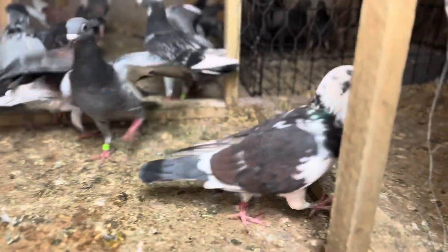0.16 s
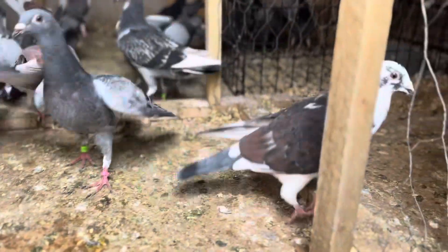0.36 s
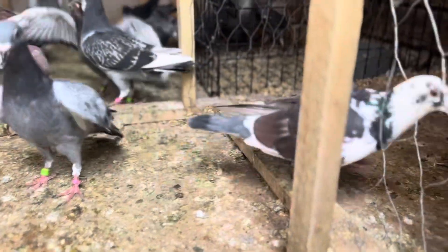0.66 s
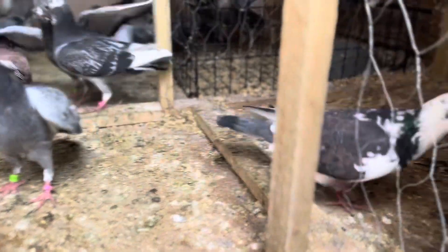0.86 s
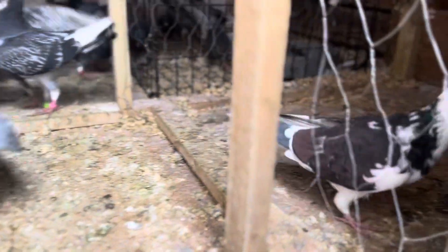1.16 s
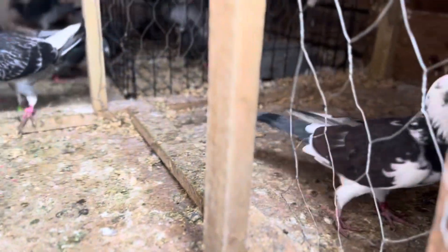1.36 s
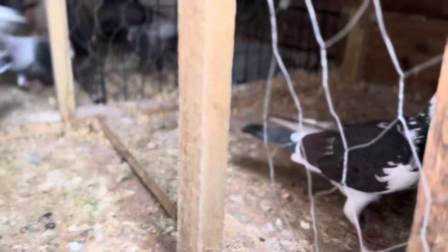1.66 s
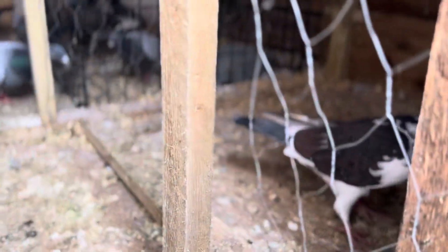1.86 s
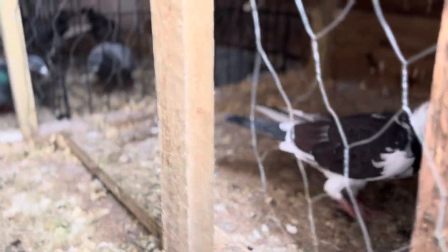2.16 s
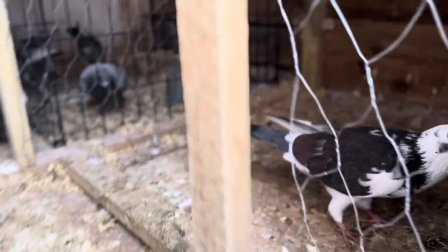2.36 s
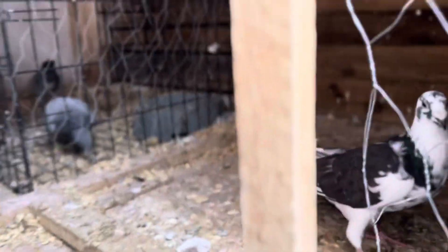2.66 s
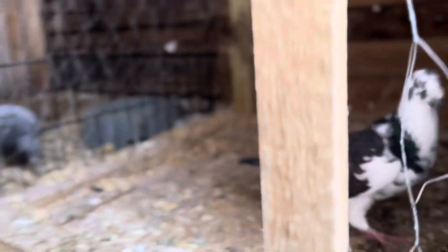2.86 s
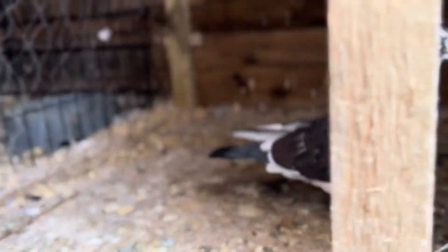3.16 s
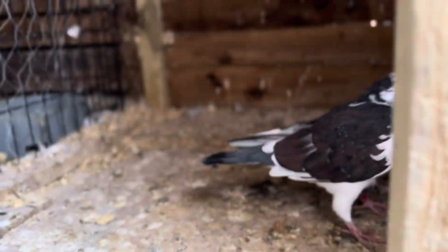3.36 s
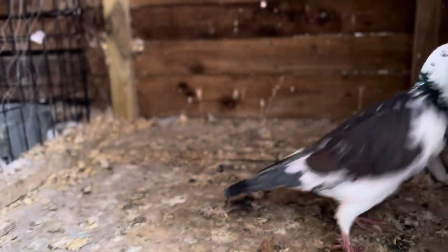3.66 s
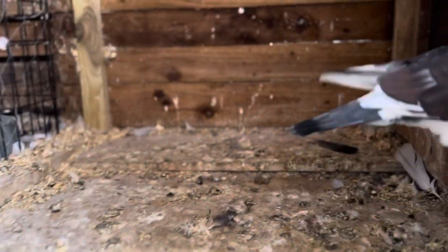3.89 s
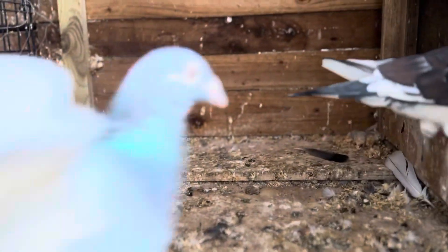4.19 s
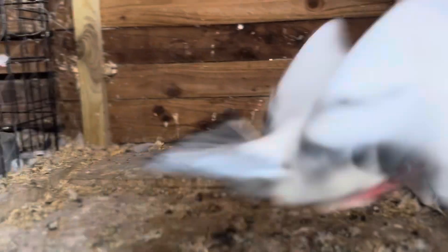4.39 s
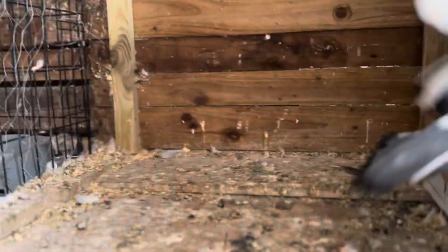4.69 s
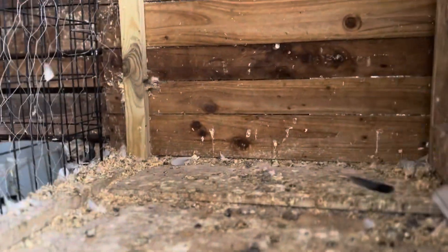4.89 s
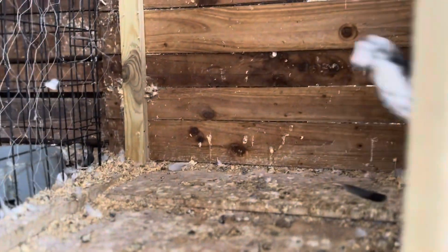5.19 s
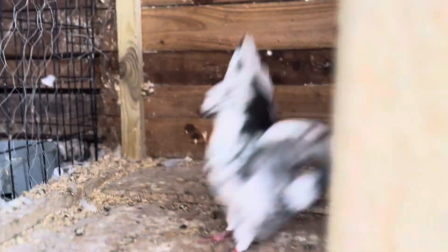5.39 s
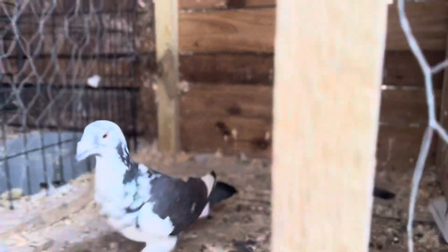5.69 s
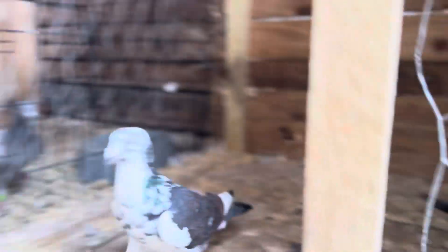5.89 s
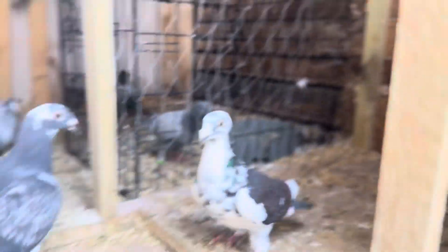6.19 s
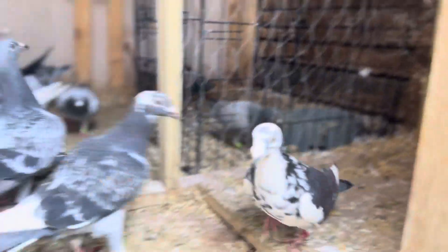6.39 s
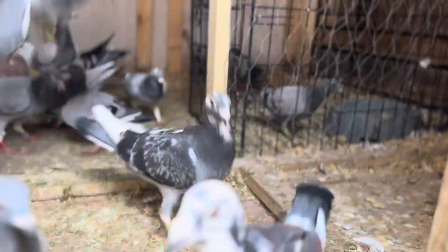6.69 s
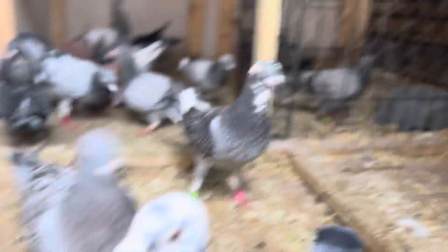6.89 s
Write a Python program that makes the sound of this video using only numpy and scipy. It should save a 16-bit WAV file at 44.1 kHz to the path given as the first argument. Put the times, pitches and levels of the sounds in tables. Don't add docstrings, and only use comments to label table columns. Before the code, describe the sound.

Inside a small plank pigeon loft, young birds give long, shrill, wavering squeals, some hoarse and doubled. A rapid run of crisp wing claps comes first, then a low buffeting gust hits the close microphones. Calls continue over litter scuffling, claw ticks, knocks and floor thumps, with another wing draught past the middle and a busy burst of flapping and a heavy thump near the end.

```python
import sys
import numpy as np
from scipy import signal
from scipy.fft import rfft, irfft, next_fast_len
from scipy.io import wavfile
from scipy.ndimage import uniform_filter1d

SR = 44100
rng = np.random.default_rng(int(sys.argv[2]) if len(sys.argv) > 2 else 0)


def master_out(mix):
    frames = np.transpose(np.atleast_2d(mix))
    ceiling = np.clip(frames, -1, 1)
    pcm = np.round(ceiling * 32767).astype(np.int16)
    wavfile.write(sys.argv[1], SR, pcm)


def level_to_linear(level):
    exponent = np.asarray(level, float) / 20
    return 10 ** exponent


N = 310905
T = np.arange(N) / SR
PORT_LAG = -14
OPPOSITE = np.array([[1], [-1]])


def colour(x, points):
    hz, db = np.transpose(points)
    log_f = np.log(np.maximum(np.arange(N // 2 + 1) * SR / N, 1))
    outside = np.maximum(np.log(hz[0]) - log_f, 0) + np.maximum(log_f - np.log(hz[-1]), 0)
    gain = level_to_linear(np.interp(log_f, np.log(hz), db) - 120 * outside)
    y = irfft(rfft(x) * gain, N)
    return y / np.sqrt(np.mean(y ** 2))


def walk(rate):
    hold = max(int(SR / rate), 1)
    levels = np.repeat(rng.standard_normal(N // hold + 1), hold)
    return 1.3 * uniform_filter1d(uniform_filter1d(levels, hold), hold)[:N]


def crackle(spiky_db):
    return rng.standard_normal(N) * level_to_linear(spiky_db * np.minimum(rng.exponential(size=N), 4))


def add(out, s, x):
    i = int(s * SR)
    out[..., i:i + x.shape[-1]] += x[..., :N - i]


def ports(x, pan_db, lag):
    return np.array([np.roll(x, lag) * level_to_linear(pan_db / 2), x * level_to_linear(-pan_db / 2)])


def ramp(times, levels):
    return np.interp(T, times, levels)


def voice(phrases, shakes, wobble, flutter_db, rough, overtone_db):
    hz, size = np.full(N, 3000.), np.zeros(N)
    for rows in phrases:
        s, pitch, db = np.transpose(rows)
        on = (T >= s[0]) & (T <= s[-1])
        hz[on] = np.interp(T[on], s, pitch)
        size[on] = level_to_linear(np.interp(T[on], s, db))
    shake_hz = 11
    for s, end, depth in shakes:
        fade = ramp([s - .04, s, end - .04, end], [0, 1, 1, 0])
        hz = hz * (1 + depth * np.cos(2 * np.pi * shake_hz * (T - s)) * fade)
    waver = wobble * (.7 * walk(30) + walk(80))
    phase = 2 * np.pi * np.cumsum(hz * (1 + waver)) / SR
    size = np.abs(uniform_filter1d(size, 400)) * level_to_linear(flutter_db * walk(60))
    air = walk(900) * np.cos(phase) + walk(900) * np.sin(phase)
    octave = level_to_linear(overtone_db) * (.9 + walk(700)) * np.sin(2 * phase)
    return size * (np.sqrt(2) * (np.sin(phase) + octave) + rough * air), size, phase


# time in seconds, pitch in Hz, level in dB.
FIRST_SQUEAL = [
    [(0, 4015, -39), (.04, 3780, -43), (.075, 3270, -48.5), (.1, 3130, -57), (.115, 3350, -44), (.14, 3580, -51.5), (.18, 3430, -45.5), (.23, 3450, -57), (.33, 3420, -54)],
    [(.355, 4326, -55), (.4, 4400, -45), (.43, 4600, -47), (.47, 4410, -55), (.51, 4160, -42), (.54, 4180, -48.5), (.58, 4234, -46), (.615, 4125, -41.5), (.65, 3490, -52)],
]
FAR_SQUEAL = [
    [(.44, 2600, -53), (.46, 2650, -52), (.49, 3050, -52), (.52, 3300, -52), (.56, 3120, -54), (.7, 3350, -59), (.78, 3350, -55), (.81, 3600, -56), (.98, 3420, -57)],
    [(.75, 3850, -52), (.78, 4100, -52), (.82, 4280, -55), (.88, 3950, -52), (.92, 4300, -49), (.97, 3800, -55), (1.02, 4300, -49), (1.04, 4150, -58)],
]
SHAKEN_SQUEAL = [
    [(1.12, 2750, -53), (1.17, 3050, -52), (1.205, 4100, -44), (1.24, 3870, -42), (1.31, 3850, -42), (1.35, 4080, -46), (1.6, 4100, -48), (1.69, 3950, -54), (1.82, 3880, -62)],
    [(1.3, 4100, -52), (1.35, 4500, -50), (1.6, 4600, -52), (1.74, 4550, -47), (1.775, 4700, -46), (1.8, 4400, -43), (1.825, 3800, -43), (1.845, 2600, -49), (1.855, 2500, -62)],
]
HOARSE_SQUEAL = [
    [(2.0, 2543, -56), (2.13, 2696, -58.5), (2.165, 3296, -51.5), (2.21, 3110, -56), (2.25, 3450, -51), (2.38, 3536, -49.5), (2.47, 3320, -55.5), (2.62, 3407, -49), (2.75, 3450, -52.5)],
    [(2.11, 3100, -64), (2.17, 3850, -54), (2.2, 3380, -57), (2.25, 3690, -48), (2.29, 4360, -49), (2.33, 4066, -36), (2.37, 4226, -48.5), (2.47, 4220, -53.5), (2.53, 4200, -49)],
]
HOARSE_SQUEAL_END = [
    [(2.77, 3650, -63), (2.83, 3250, -53), (2.87, 3200, -47), (2.9, 2720, -49.5), (2.93, 3130, -50.5), (2.95, 2800, -59), (2.97, 2990, -79)],
    [(2.54, 4100, -51), (2.63, 4200, -48.5), (2.67, 4006, -56), (2.74, 4140, -48.5), (2.8, 3875, -68)],
]
FOURTH_SQUEAL = [
    [(3.27, 2743, -50), (3.34, 3166, -56), (3.43, 3060, -57.5), (3.5, 3680, -50), (3.55, 3596, -41), (3.62, 3256, -47.5), (3.76, 3640, -51.5), (3.97, 3110, -47), (4.04, 2610, -61)],
    [(3.28, 3300, -57), (3.36, 3550, -59), (3.42, 3726, -75), (3.6, 4360, -67), (3.63, 4530, -51), (3.82, 4730, -48.5), (3.88, 4558, -51), (3.95, 3690, -56.5)],
]
FIFTH_SQUEAL = [
    [(4.78, 2690, -59), (4.84, 3206, -48.5), (4.89, 2890, -50), (4.98, 3510, -52.5), (5.06, 3410, -46.5), (5.26, 3580, -50), (5.44, 3680, -57), (5.62, 3403, -59), (5.8, 3113, -59.5)],
    [(4.7, 3560, -67), (4.81, 3800, -54), (4.9, 3700, -51.5), (5.15, 3867, -46.5), (5.3, 4340, -45.5), (5.4, 4255, -44), (5.5, 4194, -47), (5.59, 4950, -49), (5.66, 4650, -63)],
]
SIXTH_SQUEAL = [
    [(6.175, 2600, -55), (6.22, 3147, -53), (6.26, 3280, -54), (6.3, 3054, -57), (6.36, 3260, -66), (6.45, 3320, -54.5), (6.55, 3263, -62), (6.66, 3610, -49.5), (6.69, 3400, -63)],
    [(6.19, 3100, -61), (6.23, 3698, -54.5), (6.27, 4073, -49), (6.31, 3600, -56), (6.37, 3890, -47), (6.45, 4140, -51.5), (6.53, 4340, -47), (6.58, 4160, -50), (6.65, 3990, -46)],
]
LAST_SQUEAL = [
    [(6.71, 3515, -48), (6.77, 3604, -43), (6.82, 3450, -53), (6.87, 3455, -47), (6.9, 3520, -64), (6.94, 3360, -49.5), (6.98, 3270, -51), (6.99, 2900, -55.5), (7.015, 2960, -55)],
    [(6.71, 3850, -46), (6.78, 4034, -49), (6.86, 3880, -48), (6.9, 3860, -65), (6.945, 4060, -48), (6.97, 3770, -56), (7.0, 3670, -52), (7.03, 4050, -55), (7.05, 4200, -52)],
]
# time in seconds, pitch in Hz, level in dB.
LONE_PEEP = [
    (5.9, 2900, -72),
    (5.932, 3210, -59),
    (5.98, 3024, -70),
    (6.15, 3230, -74),
]
# time in seconds, pitch in Hz, level in dB.
MATE_PHRASES = [
    [(.085, 3900, -55), (.11, 4150, -57), (.135, 4050, -64)],
    [(.2, 3600, -60), (.24, 3800, -56), (.27, 3620, -60), (.3, 3620, -52.5), (.37, 3670, -56), (.41, 3950, -55.5), (.44, 4350, -56), (.46, 4760, -48.5), (.53, 4300, -55.5)],
    [(2.26, 3900, -54), (2.35, 3750, -49), (2.43, 3900, -55), (2.5, 3600, -50), (2.56, 3750, -50), (2.62, 3750, -51), (2.67, 3550, -60), (2.72, 3700, -54.5), (2.76, 3900, -64)],
    [(3.49, 3760, -53), (3.56, 3960, -48), (3.64, 3680, -58), (3.7, 3740, -51), (3.78, 3975, -51.5), (3.85, 3700, -61), (3.93, 3690, -57)],
    [(5.46, 3910, -55), (5.53, 4000, -50), (5.56, 4720, -46.5), (5.6, 4990, -52)],
    [(5.71, 2960, -66), (5.735, 2910, -58.5), (5.79, 2946, -61.5)],
    [(6.24, 3550, -54), (6.3, 3450, -54), (6.4, 3544, -61), (6.5, 3500, -56), (6.56, 4000, -49)],
]
# first crest in seconds, end in seconds, depth as a share of pitch.
LOWER_SHAKES = [
    (1.345, 1.702, 0.0496),
]
UPPER_SHAKES = [
    (1.332, 1.787, 0.0399),
    (5.212, 5.5, 0.0447),
]
# start in seconds, end in seconds, strain from 0 to 1.
STRAINED = [
    (2.22, 2.93, .9),
    (3.64, 3.82, .7),
    (5.5, 5.8, .6),
    (6.23, 6.7, 1),
]


def squeals():
    strain = sum(share * ramp([s - .05, s, end, end + .05], [0, 1, 1, 0]) for s, end, share in STRAINED)
    lower, upper = zip(FIRST_SQUEAL, FAR_SQUEAL, SHAKEN_SQUEAL, HOARSE_SQUEAL, HOARSE_SQUEAL_END,
                       FOURTH_SQUEAL, FIFTH_SQUEAL, SIXTH_SQUEAL, LAST_SQUEAL)
    wobble = .011 + .009 * strain
    low, low_size, low_phase = voice(lower + (LONE_PEEP,), LOWER_SHAKES, wobble, flutter_db=4.5 + 1.5 * strain,
                                     rough=.35 + .2 * strain, overtone_db=-19)
    high, high_size, high_phase = voice(upper, UPPER_SHAKES, wobble, flutter_db=4 + 2 * strain,
                                        rough=.3 + .2 * strain, overtone_db=-17)
    mate = voice(MATE_PHRASES, [], wobble=.018, flutter_db=5.5, rough=.5, overtone_db=-19)[0]
    both = np.sqrt(low_size * high_size)
    above = level_to_linear(-14 + 5 * strain + 3.5 * walk(25)) * np.sin(2 * high_phase - low_phase)
    below = level_to_linear(-20 + 4 * walk(12)) * np.sin(2 * low_phase - high_phase)
    drift = np.cumsum(900 * walk(22)) / SR
    between = strain * level_to_linear(4 * walk(30) - 4) * np.sin((low_phase + high_phase) / 2 + drift)
    sum_tone = level_to_linear(-14) * (2.1 + walk(900)) * np.sin(low_phase + high_phase)
    return low + high + mate + both * (sum_tone + above + below + between)


# frequency in Hz, density in dB per Hz.
FEATHER_SPECTRUM = [(1500, 5), (3000, -4), (4900, -1.5), (6600, 4.5), (8200, 4.5), (10000, -5), (13500, -2),
                    (16000, -5.5)]


def feather_noise(spiky_db):
    return colour(crackle(spiky_db), FEATHER_SPECTRUM)


# time in seconds, draught and tread near the microphones in dB, bustle in dB.
FLOCK_ACTIVITY = [(0.0, -37.5, -3), (.35, -33, 8), (.74, -34, 12.5), (1.572, -28, 16.5), (1.71, -28, 8),
                  (1.9, -35.5, -3.5), (2.49, -48, 0), (2.979, -40, -0.5), (3.4, -35, 6.5), (3.73, -40, 0),
                  (4.178, -34.5, 1), (4.42, -32.5, 10.5), (4.951, -38.5, -3), (5.422, -36.5, 5.5),
                  (5.93, -44, -10), (6.28, -39.5, -4), (6.671, -30.5, 15.5), (7.05, -37, 3.5)]
# frequency in Hz, density in dB per Hz.
RUMBLE_SPECTRUM = [(18, -52), (30, -1.5), (53, 1), (102, 1.5), (204, -7), (312, -12), (500, -20),
                   (650, -25.5), (1100, -120)]
# frequency in Hz, density in dB per Hz.
SCUFFLE_SPECTRUM = [(200, -14.5), (400, -2.5), (800, -0.5), (1600, -10.5), (2600, -11), (4500, -17)]


def flock():
    s, *columns = np.transpose(FLOCK_ACTIVITY)
    rumble_db, bustle_db = (ramp(s, column) for column in columns)
    stir = walk(4.88)
    mid, side = (colour(rng.standard_normal(N), RUMBLE_SPECTRUM) for _ in range(2))
    rumble = level_to_linear(rumble_db - 3 + 3.6 * walk(14)) * (mid + 0.37 * side * OPPOSITE)
    scuffle = np.array([colour(crackle(5.8), SCUFFLE_SPECTRUM) for _ in range(2)])
    rustle = np.array([feather_noise(4.1) for _ in range(2)])
    still = level_to_linear(-78.5) * np.roll(rustle, N // 3, axis=1) + level_to_linear(-63) * np.roll(scuffle, N // 3, axis=1)
    scuffle_gain = level_to_linear(-52 + bustle_db + 1.2 * stir + 4.5 * walk(30))
    rustle_gain = level_to_linear(-52.05 + 0.6 * bustle_db + 0.5 * stir + 2.54 * walk(30))
    return rumble + scuffle_gain * scuffle + still + rustle_gain * rustle


# time in seconds, feather clap in dB, cupped-wing slap in dB, hollow pitch in Hz.
WING_BEATS = [(.048, -22.5, -28, 764), (.477, -36.5, -24.5, 1740), (.577, -20, -19.5, 2340),
              (.675, -20.5, -25.5, 520), (.776, -12.5, -19.5, 790), (0.8754, -3.5, -19, 754),
              (0.983, -6, -15.5, 780), (1.094, -6, -13, 1360), (1.305, -21, -22, 2070),
              (1.61, -16, -22.5, 1750), (1.709, -22, -19.5, 700), (2.871, -27.5, -28, 782),
              (3.087, -30, -27, 564), (3.149, -28.5, -25.5, 795), (3.283, -26.5, -30.5, 710),
              (3.358, -16, -23.5, 1680), (3.475, -18, -22, 2163), (3.59, -16.5, -29.5, 587),
              (4.232, -25.5, -26, 780), (4.324, -12.5, -18, 890), (4.435, -21, -23.5, 700),
              (4.572, -18, -20.5, 544), (5.377, -29, -22, 680), (5.56, -35.5, -22.5, 730),
              (6.538, -18, -28.5, 1030), (6.595, -11, -13.5, 1020), (6.823, -16.5, -18, 984),
              (7.02, -20, -21, 500)]
# time in seconds, level in dB.
FLICKS = [(0.2534, -20.5), (1.2012, -14.5), (1.406, -18.5), (1.4594, -21), (1.5098, -22.5), (1.864, -30),
          (1.891, -32.5), (2.998, -25.5), (4.196, -32), (3.18, -25.5), (3.4166, -16), (3.7091, -24.5),
          (3.7693, -23), (4.637, -21.5), (4.703, -28), (5.882, -35), (5.911, -26.5), (5.9882, -33.5),
          (6.1365, -32.5), (6.739, -24.5),
          (1.536, -28.5), (2.3196, -33), (2.6549, -29.5), (4.0988, -34), (4.4094, -31), (4.5308, -29),
               (4.538, -30), (4.8294, -27.5), (4.845, -34), (5.0543, -27.5), (5.161, -34), (5.243, -32),
               (5.59, -39.5), (6.384, -32.5), (7.001, -27)]
FLUTTER_SPAN = (.4, 1.4)


def wings():
    feather = feather_noise(11.5)
    out, t = np.zeros(N), T[:SR // 5]
    brush = level_to_linear(-4) * np.minimum(t / 0.00097, 1) * np.exp(-(t / 0.016) ** 2)
    snap = level_to_linear(8) * np.exp(-((t - .0015) / 0.00077) ** 2)
    for s, db in [beat[:2] for beat in WING_BEATS] + FLICKS:
        decay_s = max(0.0042 * level_to_linear(0.64 * (db + 11)), .001)
        clap = np.minimum(t / 0.0019, 1) * np.exp(-t / decay_s) + snap
        shape = brush if FLUTTER_SPAN[0] < s < FLUTTER_SPAN[1] else clap
        i = min(int(s * SR), N - len(t))
        grain = feather[i:i + len(t)] / np.std(feather[i:i + SR // 100])
        add(out, s - .001, level_to_linear(db - 15) * grain * shape)
    return out


# time in seconds, level in dB, hollow pitch in Hz.
PLANK_KNOCKS = [(.176, -28, 1380), (.28, -27.5, 690), (.517, -25, 794), (1.338, -27, 810),
                (2.658, -26, 1000), (2.758, -29.5, 517), (3.401, -19, 810), (3.541, -24.5, 746.3),
                (4.195, -31, 980), (4.459, -24, 1200), (4.473, -29, 1270), (4.488, -28, 1050),
                (5.7, -32, 427), (5.913, -36, 800), (5.958, -36, 700), (5.995, -36.5, 810),
                (6.14, -37.5, 503), (6.3, -34.5, 606), (6.39, -34, 546), (6.49, -35, 960),
                (6.647, -23.5, 1360), (6.904, -38, 745)]
# time in seconds, level in dB, pitch in Hz.
WIRE_PLUCKS = [
    (3.151, -39, 4960),
    (3.1767, -28, 5080),
    (3.2048, -46, 4760),
]


def slaps():
    out, t = np.zeros(N), T[:SR // 8]
    rows = [(s, db, hz) for s, _, db, hz in WING_BEATS] + PLANK_KNOCKS
    wide_band = signal.butter(2, [300, 3200], "band", fs=SR, output="sos")
    for (s, db, hz), blows in zip(rows, rng.standard_normal((len(rows), len(t)))):
        blows = blows * np.minimum(t / 0.0035, 1) * np.exp(-t / 0.0038)
        ring = signal.lfilter(*signal.iirpeak(hz, 2.4, SR), blows)
        burst = ring + .35 * signal.sosfilt(wide_band, blows)
        add(out, s - .001, level_to_linear(db + 1) * burst / np.abs(burst).max())
    for s, db, hz in WIRE_PLUCKS:
        add(out, s, level_to_linear(db) * np.sin(2 * np.pi * hz * t * (1 - 1.5 * t)) * np.exp(-t / .003))
    return out


# time in seconds, level in dB, pitch in Hz.
FOOTFALLS = [(.295, -35, 112), (0.641, -37, 94.8), (0.799, -25, 116), (0.967, -26, 106), (1.987, -27, 91),
             (2.084, -27.5, 84), (2.885, -31, 112.5), (3.106, -32, 81), (3.299, -26, 113.6),
             (3.44, -30, 113), (3.492, -23.5, 135.4), (3.557, -26, 107), (4.503, -29.5, 96.5),
             (4.593, -22.5, 107.6), (4.861, -25.5, 111.4), (5.082, -31.5, 97.8), (5.406, -24.5, 110.4),
             (5.578, -31, 115), (5.961, -33, 112.4), (6.669, -24, 92.6), (6.805, -14.5, 123.6),
             (6.924, -24, 126.7)]
# time in seconds, level in dB, pitch in Hz.
EDDY_POPS = [(1.496, -20, 390), (1.717, -22, 496), (1.73, -13, 288), (1.739, -13, 254), (1.75, -19, 427),
             (1.789, -15, 330), (1.797, -17.5, 515), (1.804, -10.5, 442), (1.8212, -5, 392),
             (1.823, -10, 615), (1.836, -14.5, 380), (1.8476, -28, 483), (1.851, -21.5, 810),
             (1.868, -29.5, 442), (3.406, -30.5, 358), (3.468, -27.5, 257), (4.343, -20, 308),
             (4.381, -17.5, 230), (4.387, -15.5, 280), (4.427, -15.5, 302), (4.4351, -12.5, 327.6),
             (5.392, -26, 351.2), (6.66, -24, 273), (7.028, -24, 298)]
# time in seconds, level in dB, pitch in Hz, length in seconds.
WING_PUFFS = [
    (1.349, -31, 77.5, 0.053),
    (1.437, -24, 74, 0.016),
    (1.471, -14.5, 58.6, 0.013),
    (1.566, -15.5, 66.3, 0.02),
    (1.697, -14.5, 98, 0.03),
    (1.752, -3, 88, .0065),
    (1.794, -9, 93, 0.059),
    (1.87, -12, 91.6, 0.029),
    (4.393, -7.5, 62, 0.035),
    (6.561, -21.5, 60.7, .021),
]


def thumps():
    out, t = np.zeros((2, N)), T[:SR // 5] - .05
    eddies = colour(crackle(0.28), [(120, 22.5), (400, 3), (900, -13.5), (1400, -19.5)])
    pops = [(s, db, hz, 1.84 / hz) for s, db, hz in EDDY_POPS]
    steps = [(s, db, hz, 3.22 / hz) for s, db, hz in FOOTFALLS]
    rows = WING_PUFFS + pops + steps
    for (s, db, hz, length), (turn, slide, skew) in zip(rows, rng.random((len(rows), 3))):
        u = t / max(length, .003)
        bell = np.exp(-2.4 * u ** 2 / (1 + 0.74 * np.maximum(u, 0)))
        cycles = hz * t * (1 + 1.04 * (slide - .5) * np.tanh(u))
        spread = .3 * min(hz / 110, 1) * (skew - .3) * OPPOSITE
        swing = np.sin(2 * np.pi * (cycles + turn + spread))
        i = min(int(s * SR), N - len(t))
        add(out, max(s - .05, 0), level_to_linear(db) * bell * (swing + level_to_linear(-12) * eddies[i:i + len(t)]))
    return out


# frequency in Hz, 60 dB decay time in seconds.
LOFT_DECAY = [(100, 0.54), (500, 0.22), (1500, 0.11), (4000, 0.19), (10000, 0.089)]


def loft(x):
    t, tail = T[:SR // 2], 0
    decay_hz, decay_s = np.transpose(LOFT_DECAY)
    for hz in 63 * 2. ** np.arange(8):
        top_hz = min(hz * np.sqrt(2) * (1 + (hz > 8000)), .45 * SR)
        octave = signal.butter(2, [hz / np.sqrt(2), top_hz], "band", fs=SR, output="sos")
        t60 = np.interp(np.log(hz), np.log(decay_hz), decay_s)
        noise = signal.sosfilt(octave, rng.standard_normal((2, len(t))))
        tail = tail + noise * np.exp(-np.log(1000) * t / t60)
    tail = tail * np.minimum(t / 0.00048, 1)
    return signal.fftconvolve(x[None], tail / np.sqrt(np.sum(tail[0] ** 2)), axes=1)[:, :N]


def scene():
    young, claps, knocks, blows = squeals(), wings(), slaps(), thumps()
    room = loft(level_to_linear(1.5) * young + level_to_linear(2.7) * claps + level_to_linear(-2) * knocks + level_to_linear(-18) * blows[0])
    near = level_to_linear(5.5) * ports(young, 6.5, PORT_LAG) + ports(claps, 1, PORT_LAG)
    return near + ports(knocks, -1.5, -10) + blows + room + flock()


def starve(x, bands):
    size = next_fast_len(N, True)
    f, spectrum = np.arange(size // 2 + 1) * SR / size, rfft(x, size)
    for low_hz, high_hz, keep_db in bands:
        band = irfft(spectrum * ((f > low_hz) & (f <= high_hz)), size)[:N]
        loud = uniform_filter1d(band ** 2, 256) > level_to_linear(2 * (keep_db + 5 * walk(35)))
        x = x - band * (1 - uniform_filter1d(1. * loud, 128))
    return x


def low_pass(x):
    return signal.sosfilt(signal.butter(12, 16820, fs=SR, output="sos"), x)


def record(dry):
    high_pass = signal.butter(3, 34, "high", fs=SR, output="sos")
    mix = np.tanh(0.59 * signal.sosfilt(high_pass, dry)) / 0.6
    return low_pass(mix)


dry = scene()
out = record(dry)
master_out(out)
```